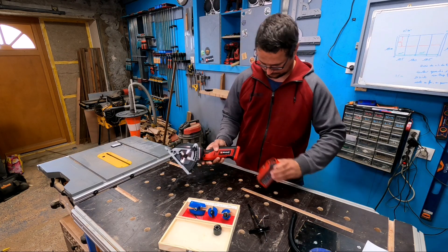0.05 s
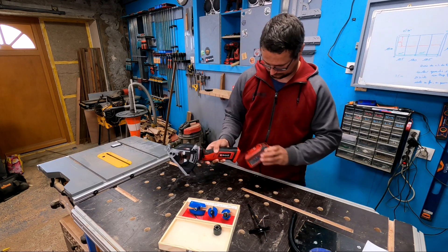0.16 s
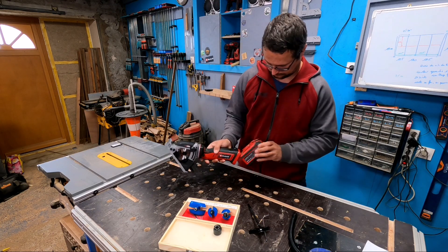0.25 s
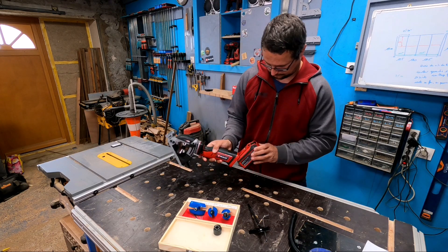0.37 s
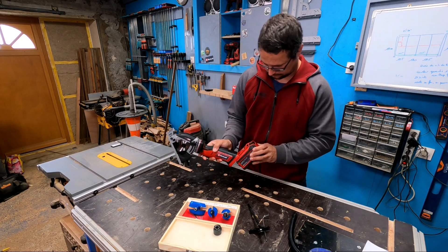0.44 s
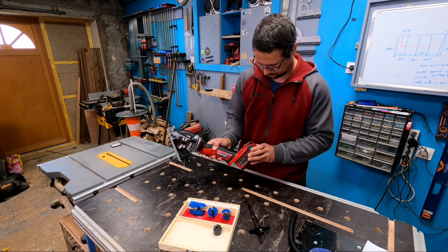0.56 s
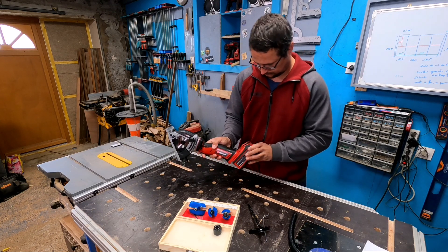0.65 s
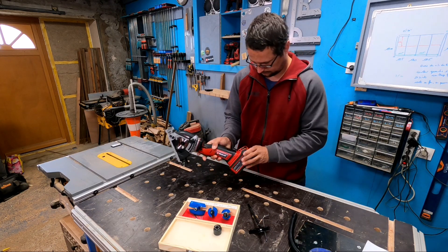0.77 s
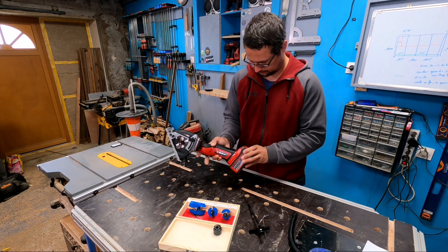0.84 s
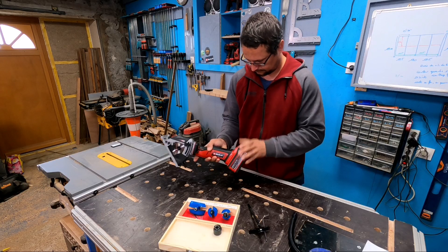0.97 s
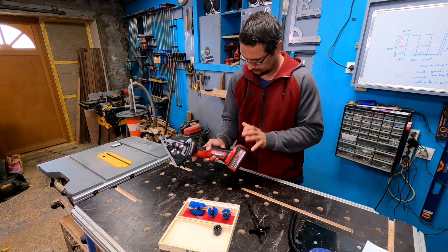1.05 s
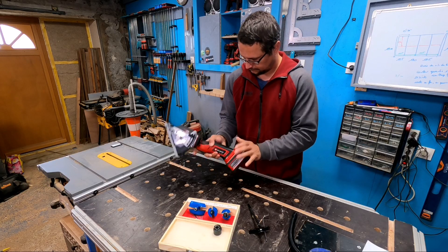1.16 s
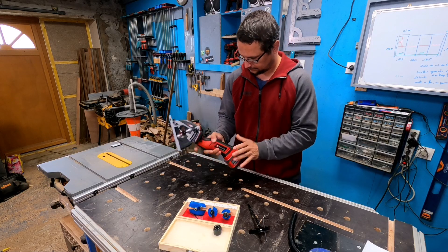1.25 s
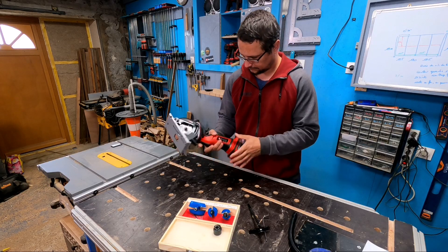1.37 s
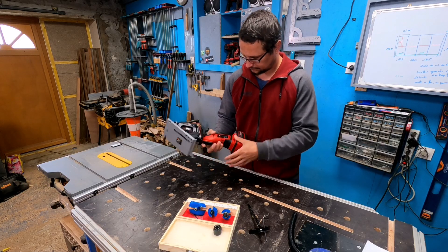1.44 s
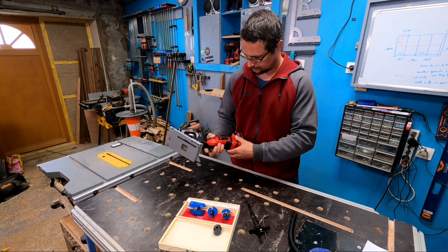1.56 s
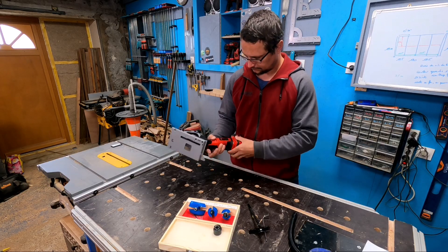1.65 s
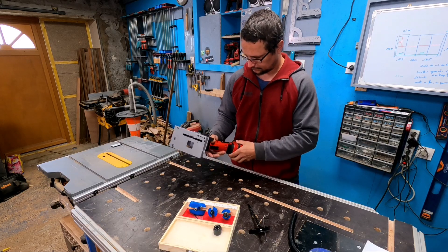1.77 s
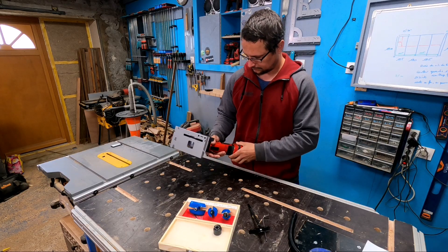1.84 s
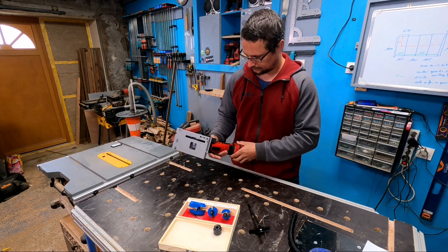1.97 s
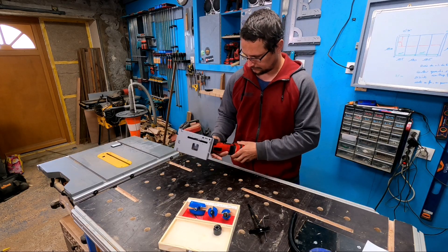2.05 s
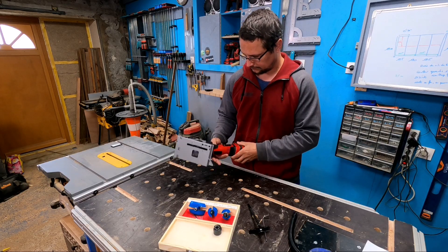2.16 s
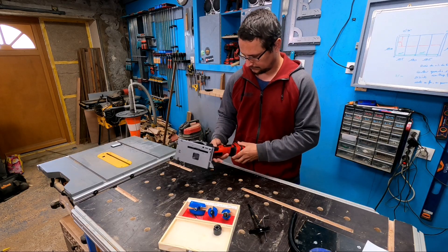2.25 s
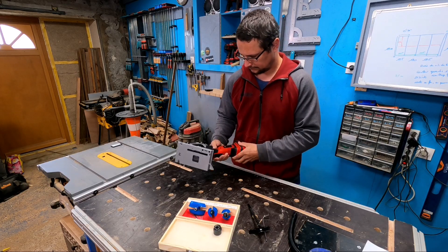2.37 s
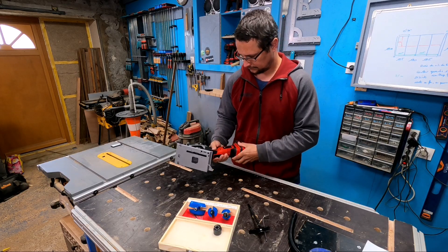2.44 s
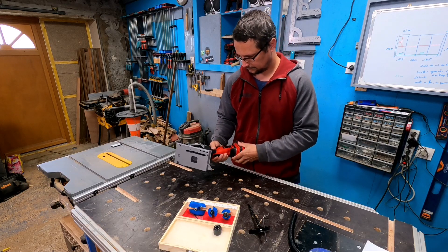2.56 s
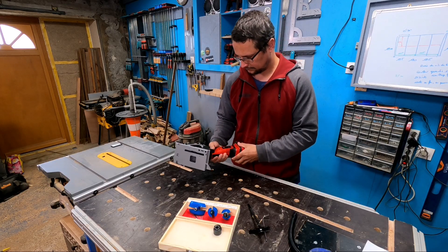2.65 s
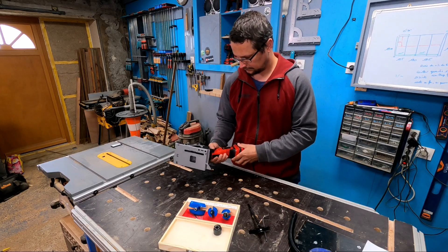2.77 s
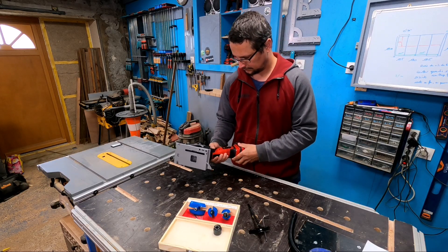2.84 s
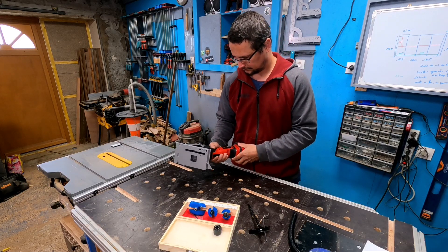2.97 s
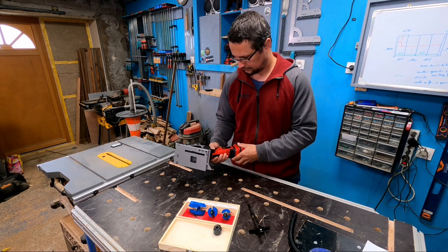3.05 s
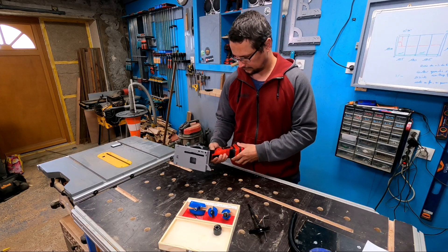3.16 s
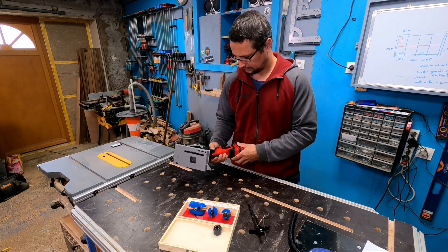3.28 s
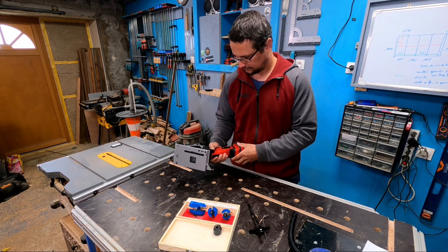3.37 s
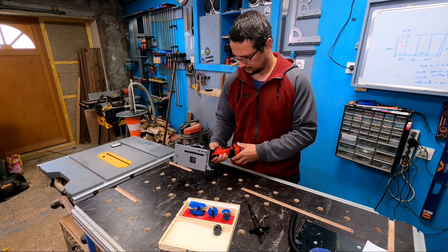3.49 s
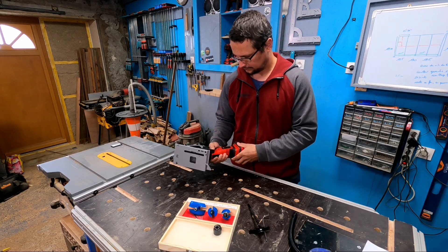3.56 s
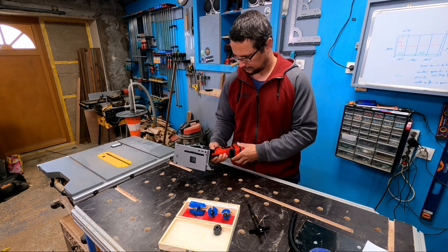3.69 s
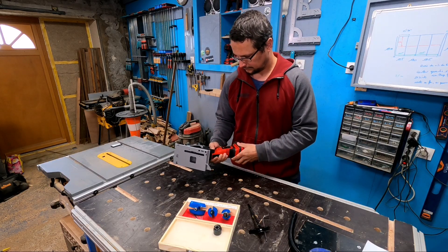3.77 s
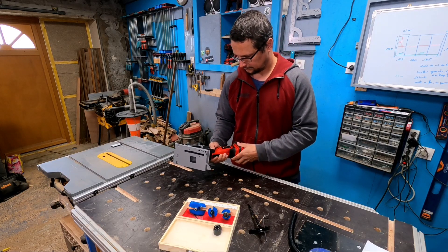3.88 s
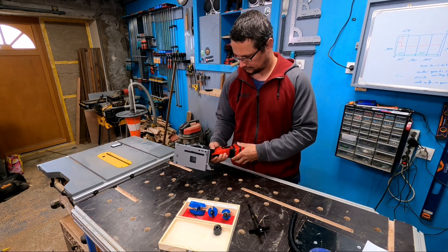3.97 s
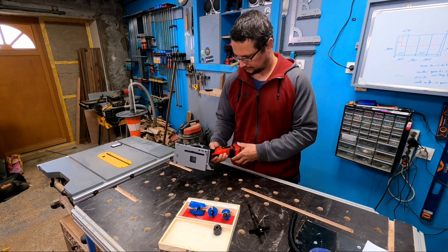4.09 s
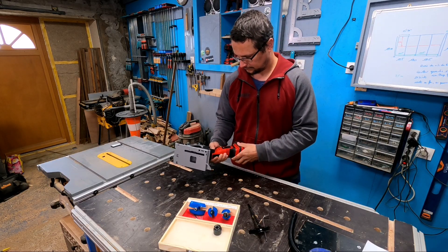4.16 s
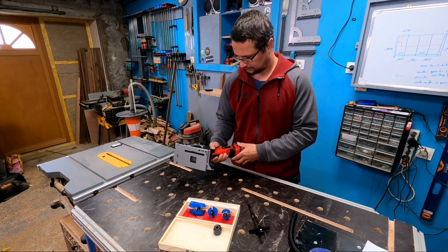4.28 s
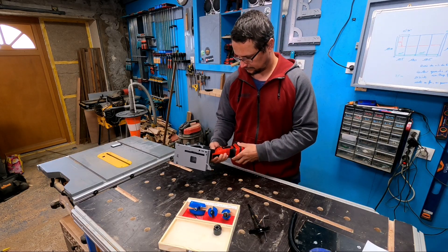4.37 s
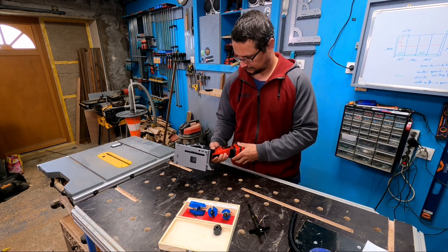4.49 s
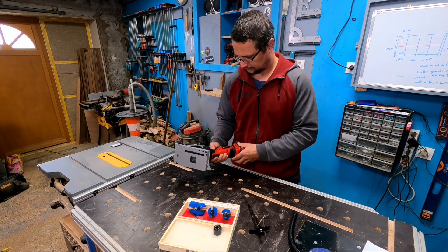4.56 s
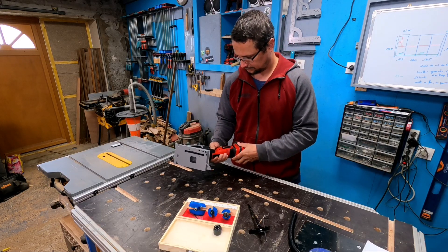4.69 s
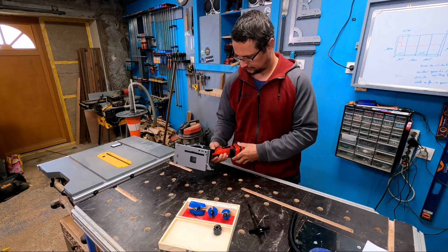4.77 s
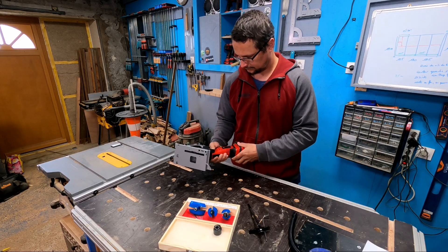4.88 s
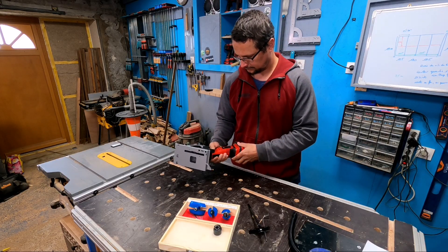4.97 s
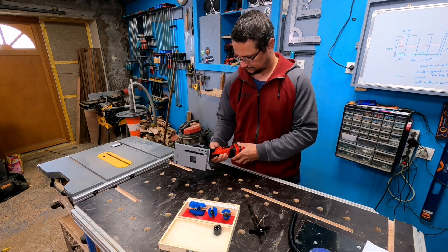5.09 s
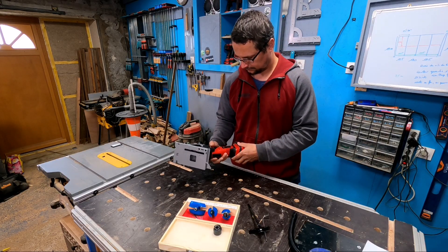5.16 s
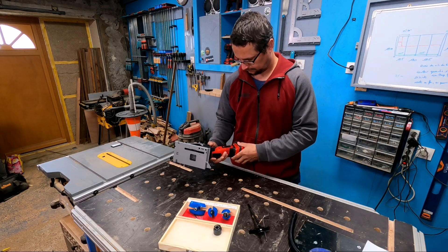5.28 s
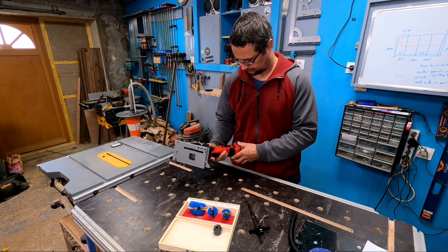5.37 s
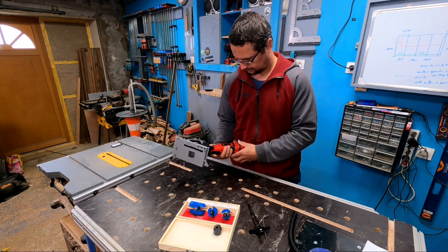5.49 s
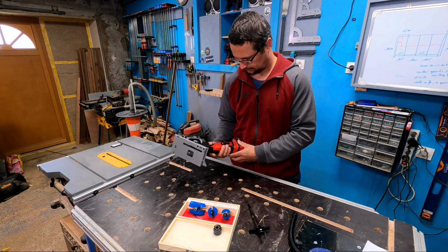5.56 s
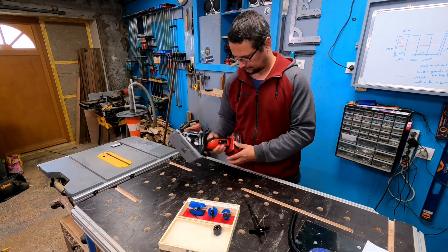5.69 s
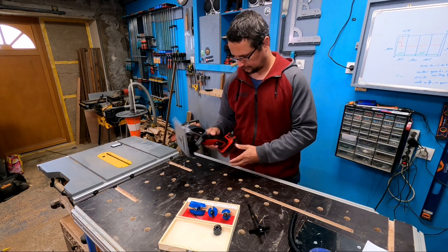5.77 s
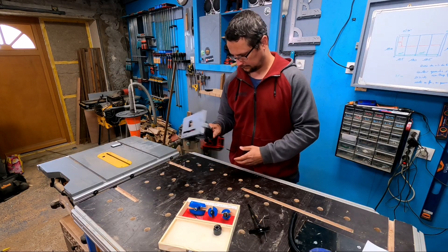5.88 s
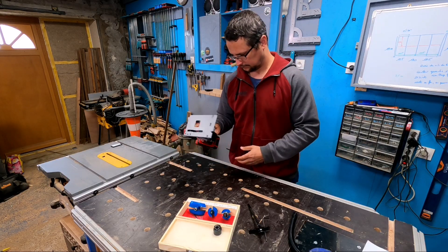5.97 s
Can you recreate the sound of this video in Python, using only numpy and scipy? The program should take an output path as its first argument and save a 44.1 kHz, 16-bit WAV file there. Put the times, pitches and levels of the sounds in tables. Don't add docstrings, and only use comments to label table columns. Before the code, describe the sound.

Quiet workshop hush with slight handling rustle. At about 0.4 s a battery pack knocks dully on its rails, with more contacts and a scrape at 0.5-0.6 s, then a cluster of clacks at 0.77-0.84 s as the latch catches, the loudest click, ringing briefly in shell and plate. From 1 to 2.5 s it is nearly silent: small rubs, faint ticks, a low creak with a tick at 2.0 s and another at 2.54 s. The switch snaps softly at 2.59 s with a thin high electronic whine. At 2.7 s the rotor jolts, knocks loosely and accelerates, its rough rattle, airy vent noise and singing tones climbing until 4.6 s. It holds a bright, hard buzz to 5.2 s, then brakes steeply, pitch dropping through resonances, breaking into bright uneven ticks and knocks from 5.6 s, almost stopped by 6.0 s. Close stereo, short room reverberation.

```python
import sys
import numpy as np
from scipy import signal
from scipy.fft import rfft, irfft, next_fast_len
from scipy.io import wavfile
from scipy.ndimage import uniform_filter1d, map_coordinates

SR = 44100
rng = np.random.default_rng(int(sys.argv[2]) if len(sys.argv) > 2 else 0)


def wrap_up_sound(samples):
    columns = np.atleast_2d(samples).T
    tamed = np.clip(columns, -1, 1)
    steps = np.round(tamed * 32767).astype(np.int16)
    wavfile.write(sys.argv[1], SR, steps)


def rack_gain(trim_db):
    fader = np.asarray(trim_db, float)
    return 10 ** (fader / 20)


N = 265834
TIME = np.arange(N) / SR
BRAKE_S = 5.22


def along(points, hz):
    f, v = np.transpose(points)
    return np.interp(np.log(hz + 1), np.log(f + 1), v)


def curves(rows, outside=None):
    s, *cols = np.transpose(rows)
    return [np.interp(TIME, s, c, outside, outside) for c in cols]


def wobble(rate):
    return map_coordinates(rng.standard_normal(int(N * rate / SR) + 4), [TIME * rate])


def bumps(rows):
    return sum(rack_gain(db) * np.exp(-.5 * ((TIME - s) / half_s) ** 2) for s, half_s, db in rows)


def body(spectrum, modes=(), broad_db=0):
    def gain(f):
        peaks = sum(rack_gain(db) ** 2 / (1 + (2 * (f - c) / w) ** 2) ** 2 for c, w, db in modes)
        return np.sqrt(rack_gain(along(spectrum, f) + broad_db) ** 2 + peaks)
    return gain


def coloured(x, gain):
    size = 2 ** 13
    cepstrum = irfft(np.log(gain(np.fft.rfftfreq(size, 1 / SR)) + 1e-6))
    cepstrum[1:size // 2] *= 2
    cepstrum[size // 2 + 1:] = 0
    h = irfft(np.exp(rfft(cepstrum)))
    return signal.fftconvolve(x, h / np.linalg.norm(h))[:len(x)]


def noise(gain, gate=1):
    return np.array([coloured(gate * rng.standard_normal(N), gain) for _ in "LR"])


def high_passed(x, hz):
    return signal.sosfilt(signal.butter(4, hz, "high", fs=SR, output="sos"), x)


# f/Hz, correlation
PORT_LIKENESS = [(100, 0.92), (1000, 0.86), (3000, 0.89), (8000, 0.77), (10000, 0.75), (13500, 0.3)]


def spread(pair):
    m = next_fast_len(N)
    turn = np.arccos(np.clip(along(PORT_LIKENESS, np.fft.rfftfreq(m, 1 / SR)), -1, 1)) / 2
    mid, side = irfft(rfft(pair, m) * [np.cos(turn), np.sin(turn)], m)[:, :N]
    return np.array([mid + side, mid - side])


# f/Hz, t60/s
ROOM_DECAY = [(150, 0.31), (1000, 0.35), (4000, 0.28), (12000, 0.24)]


def room(x):
    hz, t, z = signal.stft(rng.standard_normal((2, SR // 2)), SR, nperseg=256)
    fade = rack_gain(-60 * t / along(ROOM_DECAY, hz)[:, None])
    tail = signal.istft(z * fade, SR, nperseg=256)[1]
    delayed = np.pad(x, (150, 0))[None]
    return signal.fftconvolve(delayed, tail / np.linalg.norm(tail[0]), axes=1)


def by_speed(law, speed):
    full_db, knee_hz, below_db, above_db = law
    octaves = np.log2(speed / knee_hz)
    knee = np.log2(1 + 2. ** (-3 * octaves)) / 3
    return full_db + above_db * octaves - (below_db - above_db) * knee


def critical(speed):
    return 0.8 * np.exp(-.5 * ((speed - 200) / 22) ** 2) * (TIME <= BRAKE_S)


def coasting(speed):
    return (TIME > BRAKE_S) * np.clip(1 - speed / 200, 0, 1)


# t/s, level/dB over the rattle
KNOCKS = [(2.6997, 12), (2.755, 10), (2.77, 9), (2.79, 6), (2.8178, 8), (2.843, -4), (2.8903, 1),
          (2.926, -12), (5.5962, 5), (5.617, 4), (5.622, 0), (5.641, 8), (5.650, -2), (5.6571, 3),
          (5.6802, 0), (5.696, 0), (5.722, 5), (5.73, -1), (5.741, -1), (5.751, 8.5), (5.7738, 6),
          (5.785, 7), (5.809, -1), (5.845, 10), (5.861, 7), (5.8793, 9), (5.904, 1), (5.927, 4),
          (5.9672, 8), (6.0099, -7)]


def spindle_blows(speed, turns):
    blow_count, turn_index = int(turns[-1]) + 1, turns.astype(int)
    since_blow = turns % 1 / speed
    strength = rack_gain(1.8 * rng.standard_normal(blow_count).clip(-2, 1.6))[turn_index]
    gate = .8 + strength * np.exp(-since_blow / .003)
    loose = np.clip(1 - speed / 170, 0, 1) * rack_gain(-18 + 8 * (TIME > BRAKE_S))
    scatter = rack_gain(2 * rng.standard_normal(blow_count))[turn_index]
    gate += loose * scatter * np.exp(-since_blow / 0.00067)
    for s, db in KNOCKS:
        since = np.maximum(TIME - s, 0)
        gate += rack_gain(db) * (since > 0) * np.exp(-since / 0.003)
    return gate / np.sqrt(abs(uniform_filter1d(gate ** 2, size=3000)))


# f/Hz, level/dB per Hz
PLATE_SPECTRUM = [(410, -64.5), (700, -14), (804, -24.5), (933, -8.5), (1450, -3.5), (2200, -6.5),
                  (2860, -29.5), (4840, -120)]
# f/Hz, width/Hz, level/dB
FAST_PLATE = [(702, 24, -19), (947, 40, -17.5), (1388, 22, -10), (1470, 50, -10), (1556, 28, -7),
              (1670, 70, -11.5)]
SLOW_PLATE = [(950, 137, -11.5), (1172, 63, -4), (1400, 340, -17), (1493, 80, -3.5)]
# speed/Hz, level/dB
PLATE_WAKES = [(60, -3), (120, -2), (150, 1), (220, 2)]
# full level/dB, knee speed/Hz, dB an octave below the knee, dB an octave above
PLATE_LAW = (-22, 151.5, 7, -1.5)


def plate_drone(speed, shake_db, gate):
    level_db = shake_db + by_speed(PLATE_LAW, speed) - coasting(speed)
    level_db += (TIME <= BRAKE_S) * np.interp(speed, *np.transpose(PLATE_WAKES))
    fast = np.clip((speed - 90) / 220, 0, 1)
    plate = np.sqrt(fast) * noise(body(PLATE_SPECTRUM, FAST_PLATE, broad_db=-16.5), gate)
    plate += np.sqrt(1 - fast) * noise(body(PLATE_SPECTRUM, SLOW_PLATE, broad_db=-1.5), gate)
    return rack_gain(level_db - 3 + 0.6 * wobble(14)) * plate


# f/Hz, level/dB per Hz
RATTLE_SPECTRUM = [(1000, -68), (1700, -10), (1870, -12), (2250, 9), (2520, 8), (3080, 14), (5000, -2.5),
                   (6500, -38), (11000, -120)]
# f/Hz, width/Hz, level/dB
HOUSING = [(2052, 40, 5), (2240, 70, 5.5), (2329, 25, 2), (2644, 30, 2), (2700, 35, 4), (3085, 140, 4),
           (3545, 35, 6), (3722, 60, 5), (3870, 200, -3)]
SHUDDER_MODES = [(3077, 300, 0), (3700, 123, -0.5)]
BRAKE_MODES = [(1490, 90, -4), (2480, 160, -5), (2790, 140, -2), (3070, 120, -1)]
# speed/Hz, width/Hz, level/dB
SHUDDERS = [(106, 7.8, -27), (245, 22.5, -26)]
# full level/dB, knee speed/Hz, dB an octave below the knee, dB an octave above
RATTLE_LAW = (-22.5, 102.5, 9.5, -1.5)


def housing_rattle(speed, shake_db, gate):
    level_db = shake_db + by_speed(RATTLE_LAW, speed) + critical(speed)
    rattle = rack_gain(level_db + 0.7 * wobble(14)) * noise(body(RATTLE_SPECTRUM, HOUSING, broad_db=-11.5), gate)
    shudder = sum(rack_gain(db) * np.exp(-.5 * ((speed - hz) / width_hz) ** 2) for hz, width_hz, db in SHUDDERS)
    shudder = shudder * (TIME <= BRAKE_S)
    rattle += shudder * noise(body(RATTLE_SPECTRUM, SHUDDER_MODES, broad_db=-48), gate)
    since = TIME - BRAKE_S
    brake = rack_gain(-26.5) * np.clip(since / .04, 0, 1) * np.exp(-(since / .44) ** 2)
    return rattle + brake * noise(body(RATTLE_SPECTRUM, BRAKE_MODES, broad_db=-35), gate)


# t/s, level/dB
TICKS = [(5.732, -34.5), (5.786, -39), (5.8442, -49), (5.8607, -44), (5.8787, -42), (5.903, -28.5),
         (5.926, -35), (5.9619, -45), (6.0075, -45)]
# f/Hz, level/dB per Hz
TICK_SPECTRUM = [(3000, -29.5), (6000, 9), (8000, 3), (11000, -10), (14000, -12.5), (16000, -41.5)]


def collet_ticks():
    burst = sum(rack_gain(db) * (TIME > s) * np.exp(-np.abs(TIME - s) / 0.0036) for s, db in TICKS)
    return noise(body(TICK_SPECTRUM), burst)


# f/Hz, level/dB per Hz
AIR_SPECTRUM = [(2470, -42), (4200, -4), (4710, -11), (5570, -2), (6280, -7), (7640, -8.5), (12200, -18.5),
                (14300, -31), (15400, -65)]
# f/Hz, width/Hz, level/dB
VENTS = [(6890, 730, -8.5), (7730, 450, -8), (8230, 110, -10.5), (9970, 130, -11.5)]
# full level/dB, knee speed/Hz, dB an octave below the knee, dB an octave above
AIR_LAW = (-29.5, 113.5, 8.5, 0)


def vent_air(speed, shake_db, gate):
    level_db = shake_db + by_speed(AIR_LAW, speed) + critical(speed)
    level_db += 2 * coasting(speed)
    air = rack_gain(level_db + 0.4 * wobble(10)) * noise(body(AIR_SPECTRUM, VENTS, broad_db=-3), gate)
    hiss = signal.sosfiltfilt(signal.butter(2, 8800, "high", fs=SR, output="sos"), air)
    return air - (1 - np.clip(speed / 173, 0.31, 1)) * hiss


# f/Hz, level/dB per Hz
HUM_SPECTRUM = [(65, -94), (110, -61), (215, -27.5), (367, -6.5), (449, -4.5), (679, 1.5), (790, -3.5),
                (900, 3.5), (1170, -21.5), (1980, -120)]
# full level/dB, knee speed/Hz, dB an octave below the knee, dB an octave above
HUM_LAW = (-32, 162, 8.5, 0)


def low_hum(speed, shake_db):
    return rack_gain(shake_db + by_speed(HUM_LAW, speed) - 10.5) * noise(body(HUM_SPECTRUM))


# multiple of speed, level/dB rms on a resonance at full speed
TONES = [(1, -28.5), (2, -30), (3, -27), (3.53, -43), (4, -32.5), (4.525, -30), (5, -34), (6, -35),
         (7, -36), (8, -38), (10, -36), (15, -37.5)]
# f/Hz, width/Hz, level/dB
TONE_MODES = [(306, 30, -15), (365, 60, -22), (540, 100, -16.5), (660, 100, -13), (950, 60, -8.5),
              (1380, 130, -2), (1470, 70, 5), (1560, 120, -2), (1705, 110, 0), (1888, 60, -8),
              (2250, 120, -9), (2640, 80, -7), (3015, 200, -6), (3768, 100, -8), (5652, 140, -4)]
# t/s, level/dB
TORQUE = [(2.7, -20), (3, -3), (3.2, 0), (5.25, 0), (5.4, -4), (5.52, -10), (5.62, -4), (5.68, -3),
          (5.74, -20), (6.03, -40)]


def spindle_tones(speed, turns):
    outlet = body([(100, -60), (250, -40), (800, -26), (1150, -16), (1900, -12), (2400, -18), (4000, -26)],
                  TONE_MODES)
    braking = np.clip((TIME - BRAKE_S) / .1, 0, 1)
    tones = 0
    for k, db in TONES:
        power = .2 + k / 12 + 2 * (k % 1 > 0) + 4 * (k == 1)
        level = rack_gain(db + 5 + 2.2 * wobble(9) + 4.5 * (k == 5) * braking)
        tone = np.sin(2 * np.pi * k * turns + .7 * wobble(25))
        tones = tones + outlet(k * speed) * (speed / 377) ** power * level * tone
    return tones * rack_gain(curves(TORQUE, -120)[0])


# t/s, speed/Hz (turns per second)
SPEED = [
    (2.62, 1),
    (3.08, 87),
    (3.54, 183),
    (4.5, 364),
    (4.6, 376.3),
    (5.25, 377.3),
    (5.42, 286.7),
    (5.64, 154),
    (6.03, 23),
]
# t/s, level/dB
SHAKE = [(2.695, -15), (2.708, 10.5), (2.74, -4), (2.83, 0), (5.2, 0), (5.5, -1), (5.68, -5), (5.8, -7),
         (5.93, -6.5), (6.03, -5)]


def motor():
    speed, = curves(SPEED)
    shake_db, = curves(SHAKE, -120)
    turns = np.cumsum(speed * (1 + .0003 * wobble(30))) / SR
    gate = spindle_blows(speed, turns)
    rough = plate_drone(speed, shake_db, gate) + housing_rattle(speed, shake_db, gate) + collet_ticks()
    rough += vent_air(speed, shake_db, gate) + low_hum(speed, shake_db)
    tones = spindle_tones(speed, turns)
    return high_passed(spread(rough) + .85 * tones + .2 * room(tones)[:, :N], hz=130)


# t/s, level/dB
WHINE = [(2.6, -90), (2.607, -58), (2.635, -59), (2.645, -68), (2.655, -55), (2.7, -56), (2.8, -57),
         (2.95, -75)]
# f/Hz, level/dB
WHINE_TONES = [(3190, 3), (6380, -1), (9570, -10)]


def whine():
    level_db, = curves(WHINE, -120)
    return sum(rack_gain(level_db + db + 1.5 * wobble(35)) * np.sin(2 * np.pi * hz * TIME) for hz, db in WHINE_TONES)


# f/Hz, width/Hz, level/dB
PACK_SHELL = [(302, 62, 7), (510, 140, 2.5), (647, 180, 7)]
PACK_LATCH = [(2734, 450, -3), (3390, 740, -3.5), (4410, 1200, -15)]
PLATE_ANSWER = [(1020, 45, 0), (1590, 60, -8)]
# f/Hz, level/dB per Hz
SNAP_SPECTRUM = [(3000, -26), (5200, -4), (6600, 0), (8500, -9), (11200, -17), (13000, -24), (14500, -40),
                 (16000, -80)]


def contact_ring(low_db, high_db, snap_db, shell_hz):
    blow = 1. * (np.arange(4096) == 0)

    def struck(lo_hz, hi_hz, modes, broad_db=0):
        edges = [(lo_hz * .6, -40), (lo_hz, -10), (hi_hz, -10), (hi_hz * 1.6, -40), (hi_hz * 3, -90)]
        return coloured(blow, body(edges, modes, broad_db))

    ring = rack_gain(low_db - 1.5) * struck(150, 1200, PACK_SHELL)
    ring += struck(1000, 2200, [(shell_hz, 380, 0)])
    ring += rack_gain(-14) * struck(900, 1700, PLATE_ANSWER, broad_db=-29.0)
    ring += rack_gain(high_db + 0.5) * struck(3900, 6000, PACK_LATCH)
    return ring + rack_gain(snap_db + 7.0) * coloured(blow, body(SNAP_SPECTRUM))


# t/s, peak level/dB,
# low part/dB, high part/dB, shell f/Hz
CLICKS = [(0.372, -52, -20, -6, 1400), (0.383, -25.5, -3, -2, 1370), (0.513, -44.5, -24, -12, 1190),
          (0.539, -30.5, -11, 5, 1240), (0.595, -41.5, 3, -13, 1886), (0.6237, -36.5, -16, -12, 1490),
          (0.7704, -33.5, -37.5, -10, 2240), (0.786, -34.5, -22, -11, 1990), (0.792, -36, -24, -12.5, 2205),
          (0.8095, -24.5, -9, -11.5, 1260), (0.838, -19.5, -3, 0.5, 1580), (1.241, -69, -30, 5, 3700),
          (1.2515, -38, -9.5, 4, 1230), (1.291, -49.5, -29, -2.5, 1100), (2.172, -55, -26, -3.5, 1314),
          (0.8138, -27.5, -10, -9.5, 1500), (0.8402, -25.5, -0.5, -1.5, 2680), (0.5439, -34.5, -8, 1, 1240),
          (0.388, -34.5, -1, -0.5, 2100), (2.594, -46.5, -26, -8, 2700)]
# t/s, peak level/dB, low part/dB, high
# part/dB, snap/dB
SNAPS = [
    (0.8273, -26, -13, 8, -6),
    (1.6707, -56.5, -16.5, 0, -11),
    (2.156, -77, -11.5, 6, -5.5),
    (2.182, -64, -19, 20, 18.5),
    (2.2158, -52.5, -2, 5.5, 9.5),
    (2.582, -81, -18, 18, -3),
    (2.592, -49, -30, 17.5, 8),
    (5.8447, -37, -23, 2, -16),
]


def clicks():
    out, t = np.zeros((2, N + SR)), np.arange(4096) / SR
    contacts = [(s, db, low, high, -23 + .8 * high, hz) for s, db, low, high, hz in CLICKS]
    contacts += [(*row, 2100) for row in SNAPS]
    for s, db, low_db, high_db, snap_db, shell_hz in contacts:
        ring = contact_ring(low_db, high_db, snap_db, shell_hz)
        crack = rng.standard_normal(len(t)) * rack_gain(-60 * t / .014) * (1 - np.exp(-t / .0004))
        sparse = rng.standard_normal(len(t)) * (rng.random(len(t)) < .004)
        crack += 8 * rack_gain(-22) * np.exp(-t / .04) * sparse
        crack /= np.linalg.norm(crack)
        wet = rack_gain(db + 17.5) * room(ring)
        wet[:, :len(t)] += rack_gain(db + 22.5) * signal.fftconvolve(ring, crack)[:len(t)]
        out[:, round(s * SR):][:, :wet.shape[1]] += wet
    return high_passed(out[:, :N], hz=130)


# t/s, length/s, level/dB, f/Hz, width/Hz
LINGERS = [(0.387, 0.048, -48, 2100, 200), (.513, 0.093, -52, 1104, 90), (0.531, .03, -41.5, 1170, 120),
           (.63, .06, -52, 2210, 301.6), (0.768, .03, -43, 2230, 244.7), (0.841, .16, -40, 1005, 70.1),
           (0.85, .15, -45.5, 1585, 167.8), (0.844, 0.12, -43, 738, 130.5), (2.61, .09, -59.5, 1300, 260),
           (2.605, .09, -58, 2000, 84), (2.699, 0.024, -44.5, 1540, 200), (1.252, 0.034, -56, 1300, 300),
           (1.255, .04, -56, 2600, 398), (2.175, .03, -52, 4800, 400), (2.218, .06, -67, 2900, 400),
           (2.222, 0.064, -68, 1300, 300), (2.698, 0.069, -60.5, 550, 200), (3.271, 0.11, -41, 690, 90),
           (3.6, 0.19, -34, 1215, 70), (.384, .006, -32.5, 1400, 298), (2.54, 0.036, -65, 1250, 400),
           (1.5, 0.036, -71, 1160, 200), (1.671, .01, -60, 2230, 300), (3.801, .22, -32.5, 950, 40),
           (3.113, .12, -31.5, 3090, 99.3), (5.33, 0.11, -26.5, 1520, 60), (5.621, 0.054, -49.5, 298, 40)]


def lingers():
    out, t = np.zeros(N + SR), np.arange(SR // 3) / SR
    for s, length, db, hz, width_hz in LINGERS:
        resonance = body([(50, -60), (20000, -60)], [(hz, width_hz, 0)])
        hum = coloured(rng.standard_normal(len(t)), resonance)
        fade = rack_gain(db - 63 * t - 60 * (t - length).clip(0) / 0.2)
        out[round(s * SR):][:len(t)] += np.clip(t / .003, 0, 1) * fade * hum
    return out[:N]


# t/s, length/s, dull level/dB, bright level/dB
RUBS = [(0.0, 0.035, -62.5, -62.5), (0.064, 0.11, -71, -64), (0.193, 0.095, -78, -77),
        (0.355, 0.0084, -68, -79), (0.506, 0.042, -60, -64), (0.538, 0.13, -46.5, -57.5),
        (0.779, 0.047, -56, -52), (0.817, 0.013, -38, -34.5), (1.035, 0.062, -74, -70),
        (1.413, 0.062, -77.5, -67.5), (1.58, 0.078, -86, -74), (1.68, 0.04, -77, -74),
        (0.738, .02, -73, -69), (0.763, 0.01, -57, -57), (1.498, 0.0267, -83, -79),
        (2.146, 0.016, -68, -70), (2.174, 0.014, -65, -59), (2.204, 0.017, -65, -51),
        (0.849, 0.086, -44.5, -47), (1.247, 0.035, -53, -54), (2.5, 0.043, -74, -89),
        (2.603, 0.14, -72, -60)]
# f/Hz, level/dB per Hz
RUB_DULL = [(88, -46.5), (150, -11.5), (182, 0.5), (230, -14.5), (395, -4), (621, -7), (1480, 2.5),
            (2800, -4.5), (3640, -38), (6160, -120)]
RUB_BRIGHT = [(1290, -35.5), (2200, -5.5), (2800, -2.5), (4330, -4.5), (4840, -4), (7440, -11.5),
              (11500, -24), (15000, -53), (22000, -120)]


def rubs():
    start, length, *level_db = np.transpose(RUBS)[:, :, None]
    since = TIME - start
    fade_db = -30 * since.clip(0) - 60 * (since - length).clip(0) / .2
    stroke = np.clip(since / .01, 0, 1) * rack_gain(fade_db)
    dull, bright = ((rack_gain(db) * stroke).sum(axis=0) for db in level_db)
    grain = rack_gain(1.5 * wobble(300) + 1.5 * wobble(40))
    dry = dull * noise(body(RUB_DULL), grain) + bright * noise(body(RUB_BRIGHT), grain)
    return 1.81 * spread(dry) + 0.16 * room(dry[0])[:, :N]


# t/s, peak level/dB, left minus right/dB
CREAKS = [(1.037, -50, -11), (1.279, -61, -1), (1.998, -46.5, -11), (2.536, -40.5, -10.5), (3.055, -61, -8),
          (3.238, -52.5, -12), (4.791, -67, -10), (4.936, -52, -8)]
# t/s, level/dB
MOUNT_TICKS = [
    (1.9984, -34.5),
    (2.539, -44.5),
]


def creaks():
    out, t = np.zeros((2, N + SR)), np.arange(1, 3000) / SR
    swing = np.sin(np.pi * np.log(t / .0006) / np.log(3)) * (t > .0002)
    swing *= np.exp(-t / 0.0082) + 0.037 * np.exp(-t / 0.018)
    swing = uniform_filter1d(swing, size=24)
    for s, db, pan_db in CREAKS:
        level = rack_gain(db + 10.0 + np.array([[.5], [-.5]]) * pan_db)
        out[:, round((s + .0016) * SR):][:, :len(t)] += level * swing
    for s, db in MOUNT_TICKS:
        tick = rack_gain(db) * rng.standard_normal(60) * np.exp(-np.arange(60) / 15)
        out[:, round(s * SR):][:, :60] += tick * [[.5], [1]]
    out[0] = uniform_filter1d(out[0], size=14)
    return uniform_filter1d(out[:, :N], size=2)


# middle t/s, half length/s, level/dB
PUSHES = [(.37, 0.05, -59), (.82, .04, -75), (1.1, 0.056, -64.5), (1.28, 0.043, -63), (1.84, 0.065, -85),
          (2.01, 0.026, -59.5), (2.55, 0.025, -59), (2.3, 0.1, -81), (2.75, 0.074, -83), (3.4, .05, -79),
          (3.1, 0.033, -78), (3.25, 0.036, -67), (3.66, .08, -75), (4.94, 0.046, -65), (5.3, .15, -79)]
# middle t/s, half length/s, level/dB
BOOMS = [
    (.06, 0.11, -60.5),
    (.43, 0.041, -53),
    (.62, 0.11, -69.5),
]
# f/Hz, level/dB per Hz
HUSH = [(80, -30), (140, 4), (250, 0), (400, -4), (800, -6), (1100, 0), (2500, -4), (5500, -5), (9800, -14),
        (13000, -20), (15000, -40)]


def floor():
    shaken = rack_gain(-33.5 + by_speed(RATTLE_LAW, curves(SPEED)[0]) + curves(SHAKE, -120)[0])
    push_level = (rack_gain(-90.5) + bumps(PUSHES)) * rack_gain(3.0 * wobble(2.8))
    push = push_level * noise(body([(12, -18.0), (25, 3), (45, -9.5), (75, -34.0), (110, -60.0)]))
    murmur_body = body([(90, -42.0), (140, -3.5), (200, 4.0), (300, 13.5), (500, -11.5), (800, -42.0)])
    murmur = (rack_gain(-83) + shaken) * noise(murmur_body)
    boom_body = body([(80, -39.5), (140, -11.0), (195, 3.5), (300, -15.0), (500, -18.5), (900, -37.5)])
    boom = bumps(BOOMS) * noise(boom_body)
    return spread(push + murmur + boom + rack_gain(-77) * noise(body(HUSH)))


def scene():
    return motor() + whine() + clicks() + lingers() + rubs() + creaks() + floor()


def band_limit(x):
    return signal.sosfilt(signal.butter(12, 15570, fs=SR, output="sos"), x)


# f/Hz, phase/rad
LEAD = [(350, 0), (1000, -.2), (1700, -.23), (2500, -.5), (3600, -.58), (5200, -.3), (8600, -.3),
        (11000, -.05), (12500, .23)]


def record(dry):
    m = next_fast_len(N + 999)
    hz = np.fft.rfftfreq(m, 1 / SR)
    turn = np.exp(.5j * along(LEAD, hz)) * (hz < 15600)
    mix = irfft(rfft(dry, m) * [turn, turn.conj()], m)[:, :N]
    return band_limit(mix)


dry = scene()
out = record(dry)
wrap_up_sound(out)
```